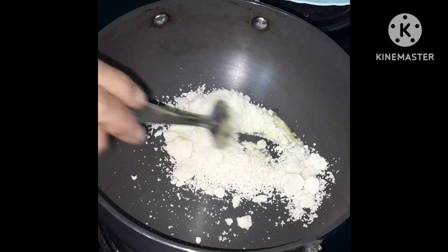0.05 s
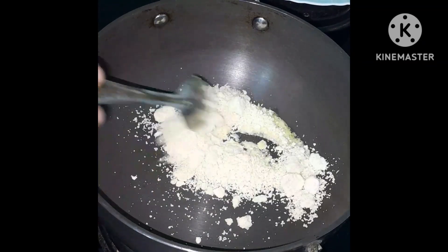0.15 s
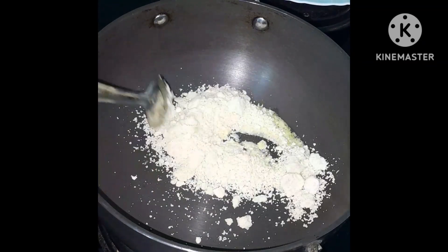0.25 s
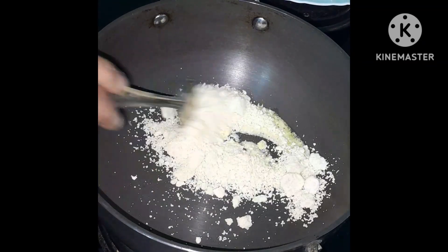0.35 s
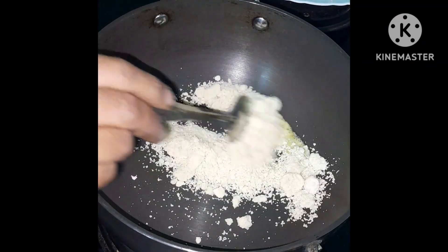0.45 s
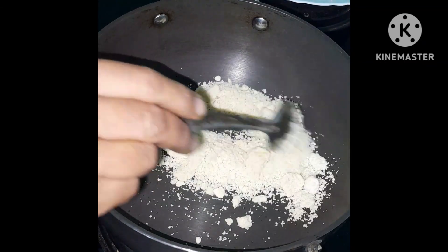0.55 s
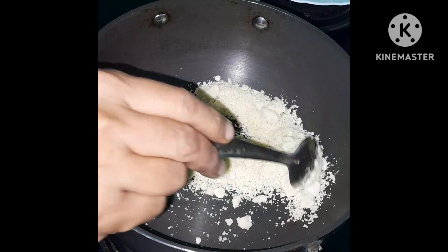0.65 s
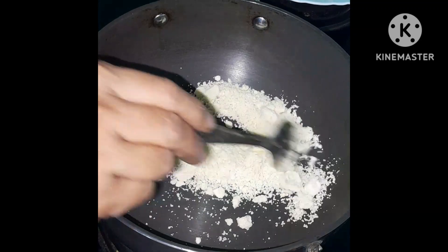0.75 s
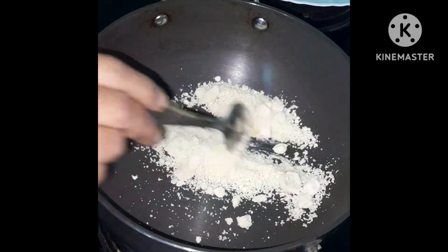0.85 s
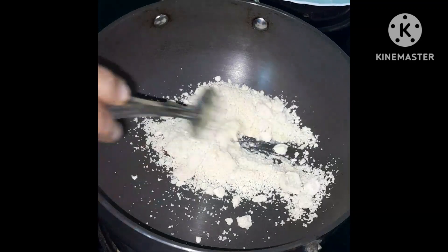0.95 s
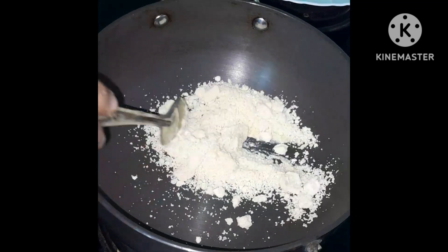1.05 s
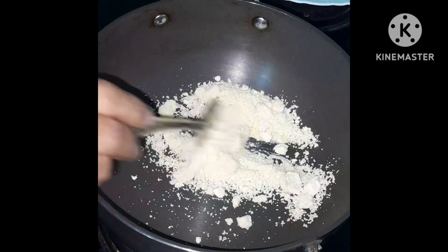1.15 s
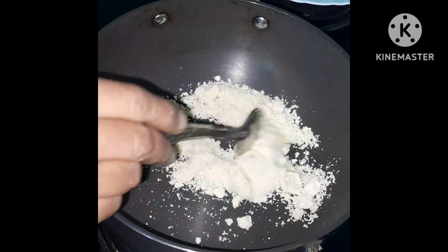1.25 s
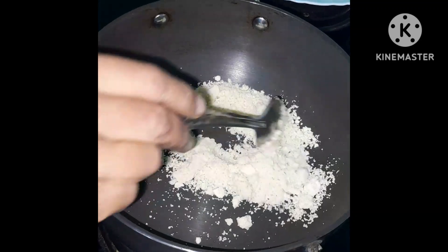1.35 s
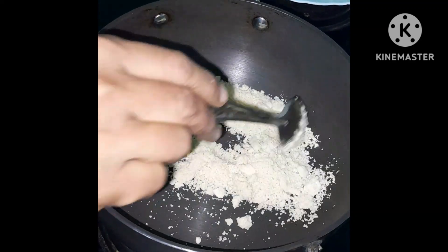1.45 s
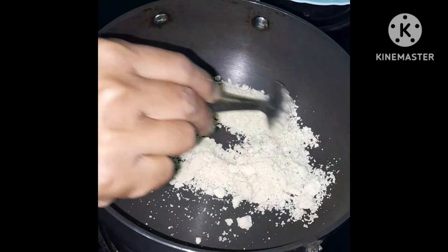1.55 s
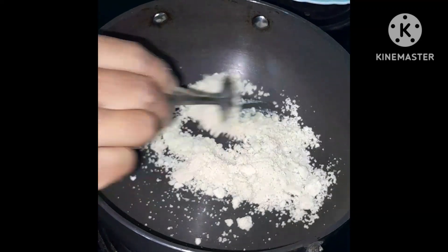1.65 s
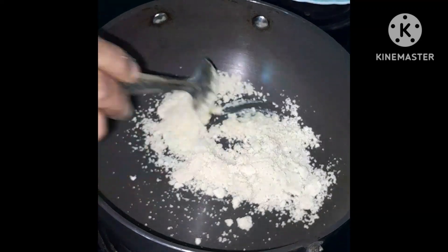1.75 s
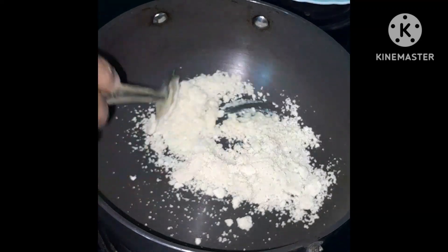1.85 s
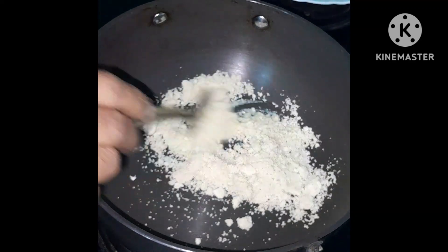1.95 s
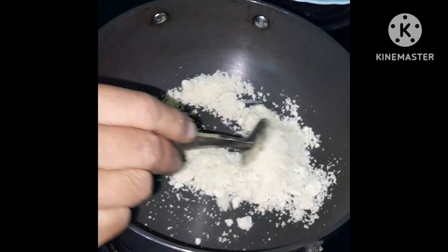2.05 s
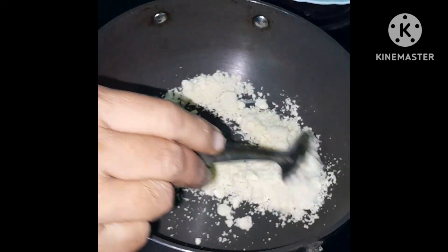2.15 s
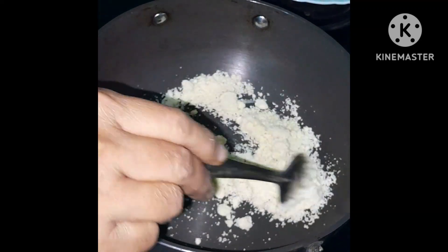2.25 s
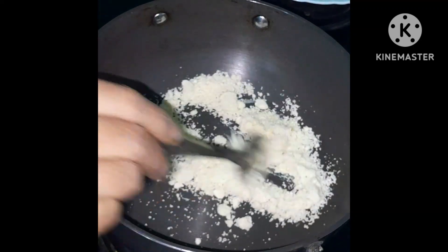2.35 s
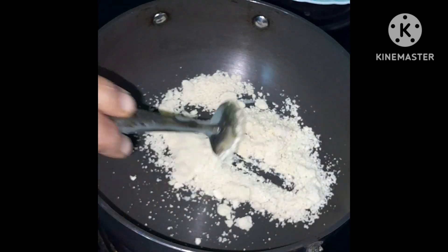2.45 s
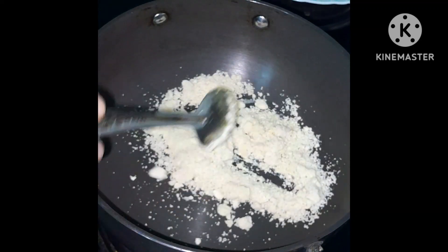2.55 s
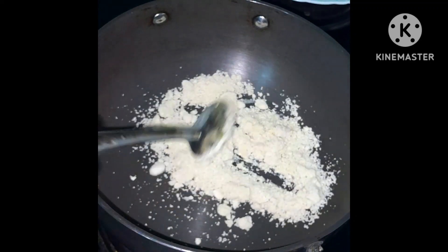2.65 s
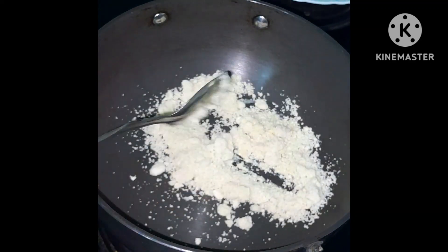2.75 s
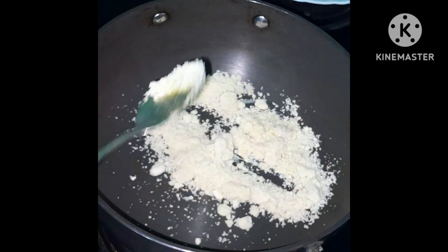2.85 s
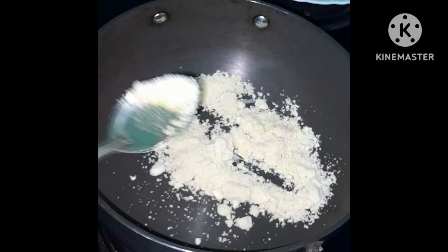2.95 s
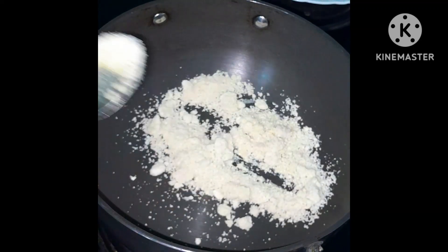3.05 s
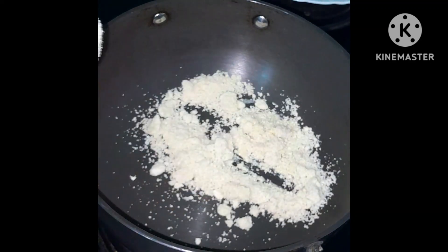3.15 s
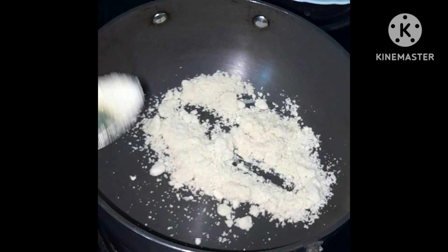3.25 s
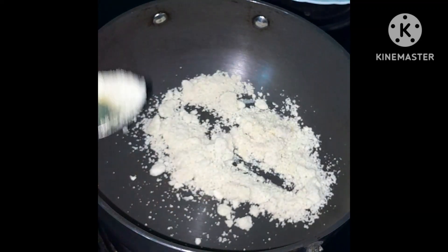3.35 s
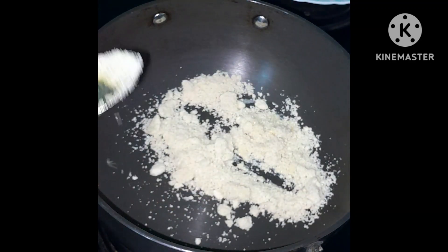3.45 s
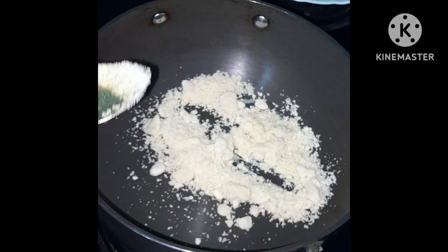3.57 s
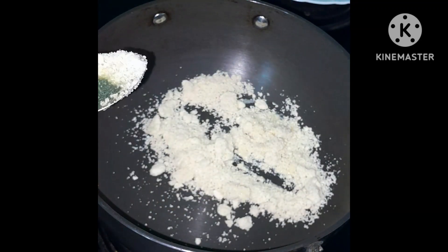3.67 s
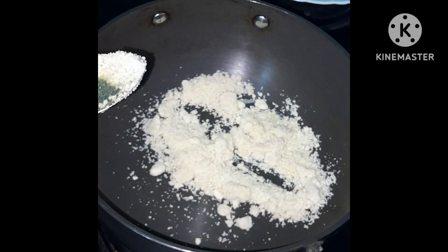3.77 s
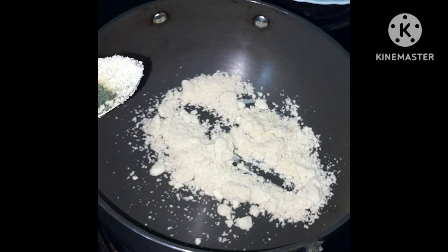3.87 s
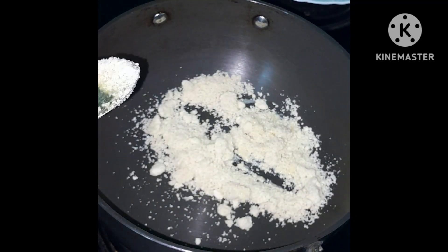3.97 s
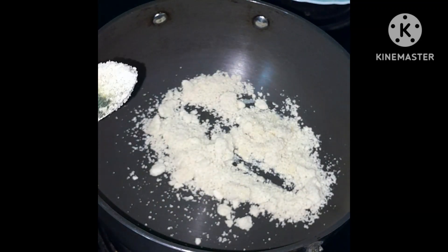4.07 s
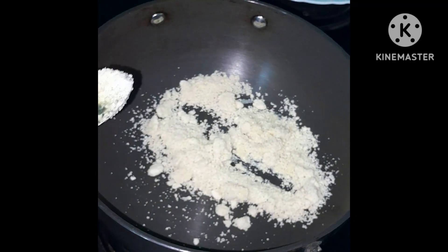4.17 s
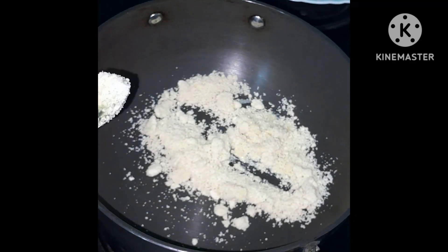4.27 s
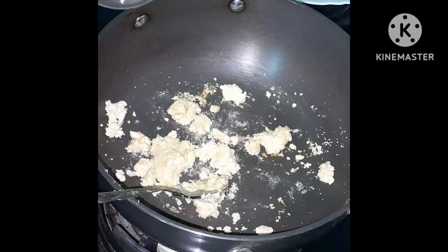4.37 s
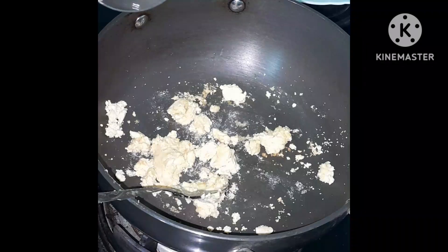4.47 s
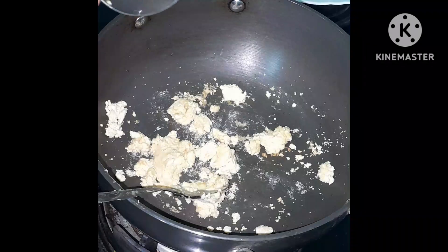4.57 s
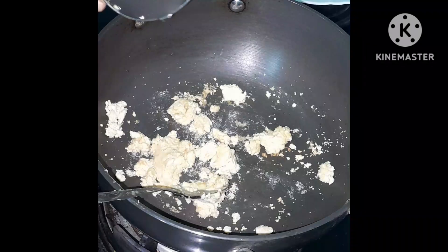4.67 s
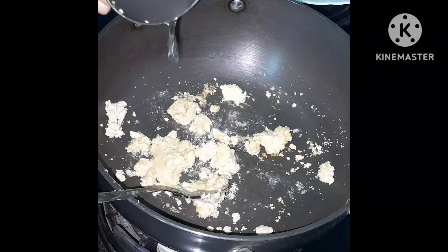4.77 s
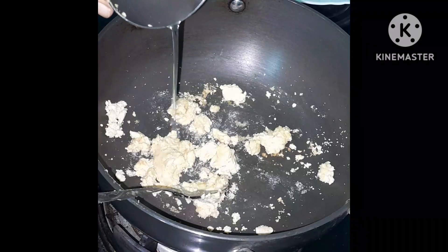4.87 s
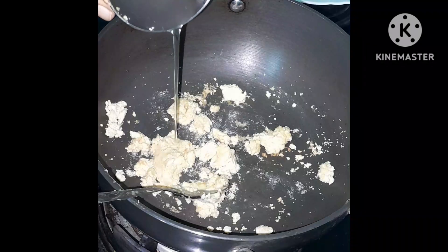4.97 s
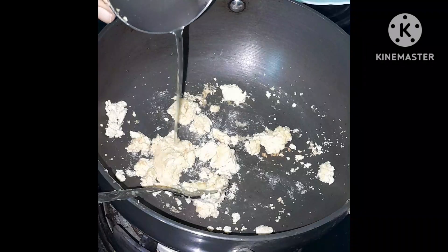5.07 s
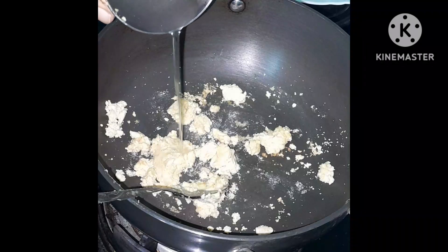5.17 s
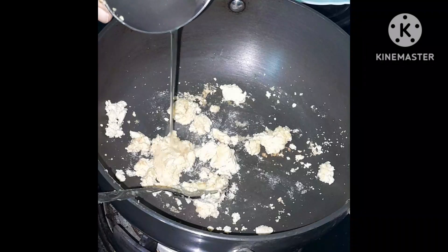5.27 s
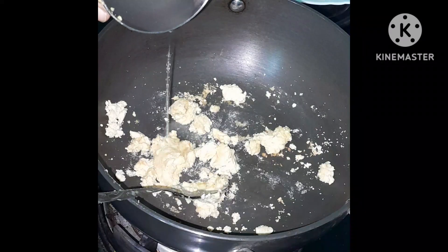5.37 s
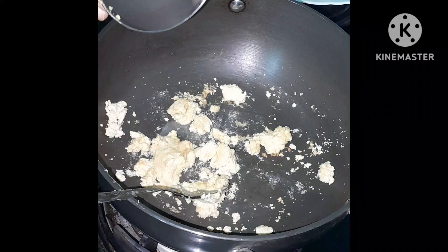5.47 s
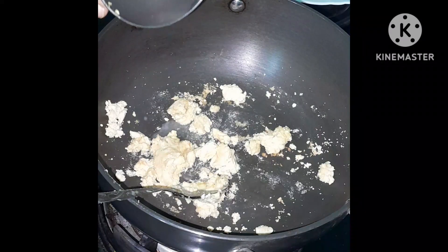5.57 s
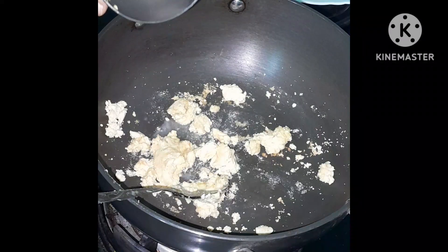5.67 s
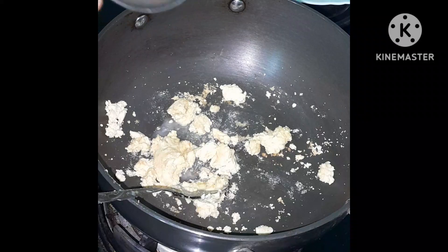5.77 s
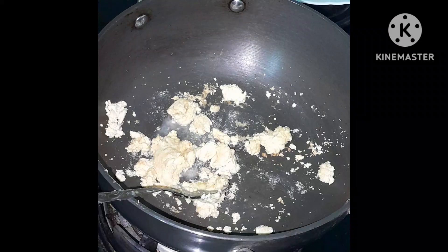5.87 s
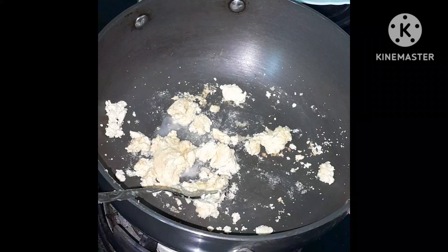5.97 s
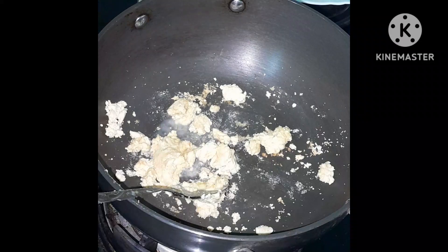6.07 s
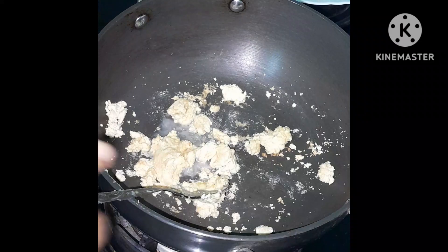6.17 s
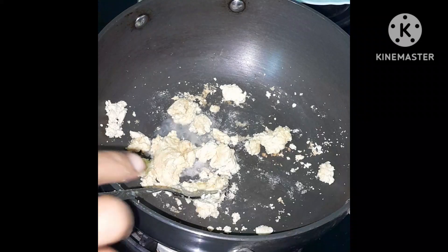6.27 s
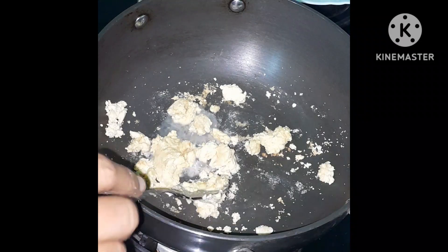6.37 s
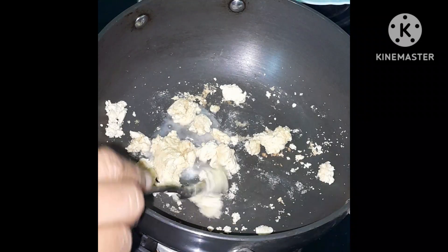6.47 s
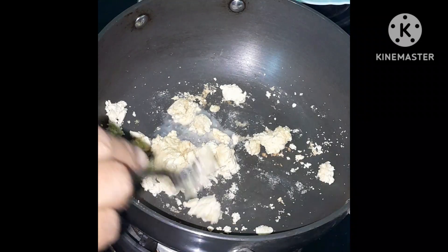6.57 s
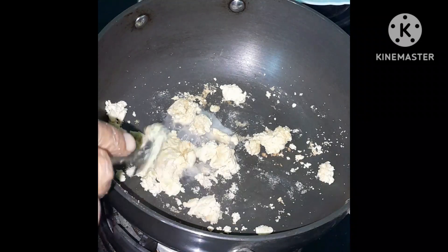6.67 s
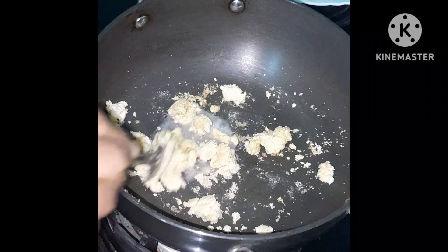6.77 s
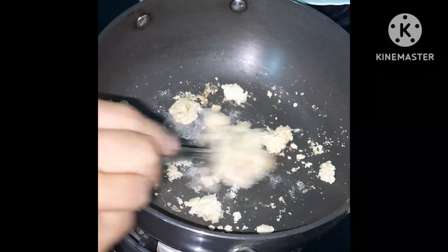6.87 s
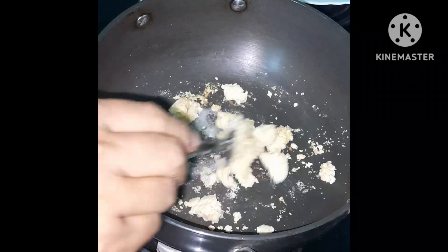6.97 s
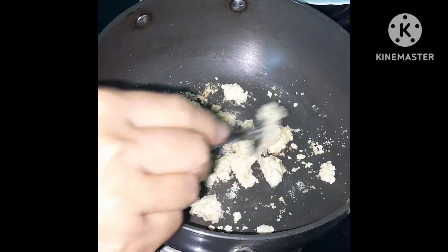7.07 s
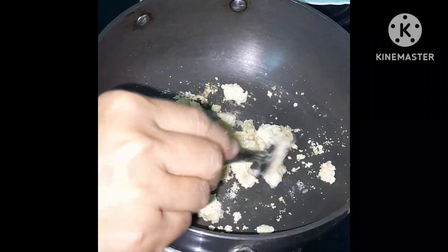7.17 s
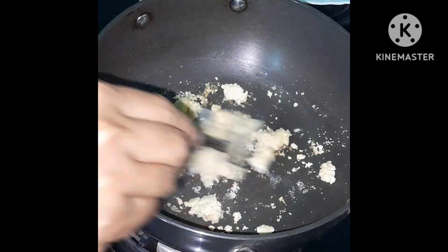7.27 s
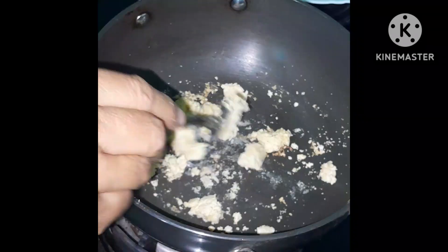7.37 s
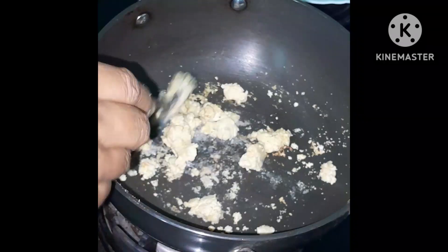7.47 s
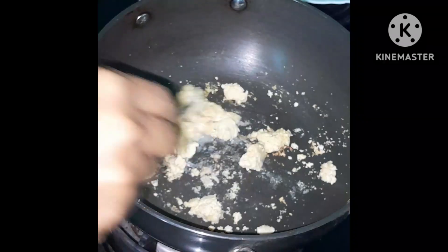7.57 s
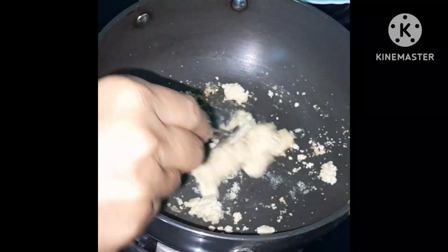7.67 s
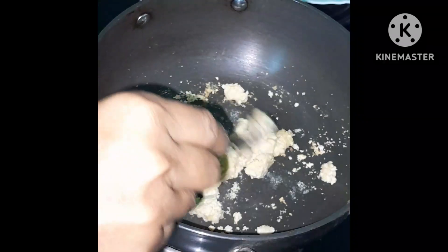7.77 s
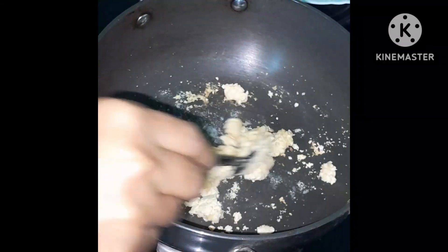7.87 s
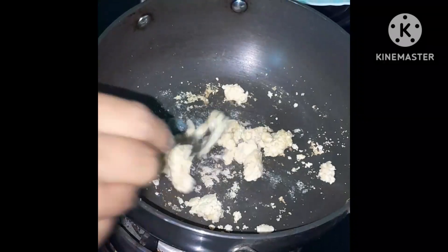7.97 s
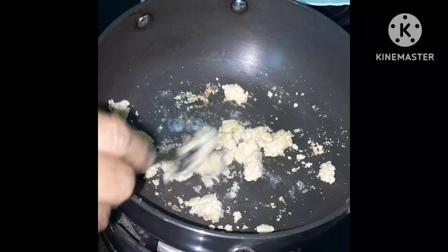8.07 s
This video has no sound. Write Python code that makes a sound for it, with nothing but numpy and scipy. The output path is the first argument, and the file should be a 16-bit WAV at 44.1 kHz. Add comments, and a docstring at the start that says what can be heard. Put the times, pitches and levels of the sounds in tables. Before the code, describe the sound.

From the start until about 2 seconds, a steel spoon taps and scrapes through dry powder in a pan, in short crunchy strokes with brief metallic rings, the sharpest at the opening and at 1.6 seconds. Lighter, bright clinks continue until about 2.9 seconds. A gas flame flutters quietly underneath throughout, with a faint hiss. A distant hoarse call comes near 1.1 seconds, and a faint bird trills and sings two falling notes from 3.5 to 4.2. The sound fades to a moment of silence around 4.4 seconds. Another far call comes near 4.9. At 5 seconds ghee starts sizzling, a grainy fizz over bubbling, growing until 7.3 and then easing. Between 6.9 and 7.8 seconds the pan knocks on its stand several times, hardest at 7.2, followed by a sharp double spoon tap. Two spaced microphones hear it in a small, hard-walled kitchen.

```python
"""A steel spoon taps and scrapes through dry powder in a pan, making the metal ring and the powder crunch.
A gas flame flutters under the pan; far off, a bird whistles and hoarse calls sound.
After a fade to silence, ghee sizzles in the hot pan as steam bubbles burst, and the stirred pan knocks
on its stand. Two spaced microphones hear it all in a small kitchen with hard walls."""
import sys
import numpy as np
from scipy import signal
from scipy.fft import rfft, irfft, next_fast_len
from scipy.io import wavfile
from scipy.ndimage import map_coordinates

SR = 44100
rng = np.random.default_rng(int(sys.argv[2]) if len(sys.argv) > 2 else 0)


def log_audio(samples):
    """Write samples as a 16-bit WAV file to the path given in sys.argv[1]."""
    # one column per channel
    frames = np.atleast_2d(samples).T
    # limit to full scale, then quantise
    limited = np.clip(frames, -1, 1)
    pcm = np.round(limited * 32767).astype(np.int16)
    wavfile.write(sys.argv[1], SR, pcm)


N = 358533
TIME = np.arange(N) / SR


def amp(db):
    """Turns decibels into a number to multiply by."""
    return 10 ** (np.asarray(db) / 20)


def along(points, hz):
    """Reads between (frequency, value) points, spaced by octaves."""
    f, v = np.transpose(points)
    return np.interp(np.log(hz + 1), np.log(f + 1), v)


def curves(rows):
    """Joins timed rows with straight lines, one curve per column after the time."""
    times, *columns = np.transpose(rows)
    return [np.interp(TIME, times, column) for column in columns]


def wobble(rate):
    """A smooth curve through `rate` random values a second."""
    return map_coordinates(rng.standard_normal(int(N * rate / SR) + 4), [TIME * rate])


def filtered(x, response):
    """Turns each frequency of x up or down as `response` says."""
    size = next_fast_len(x.shape[-1] + SR // 5)
    return irfft(rfft(x, size) * response(np.fft.rfftfreq(size, 1 / SR)), size)[..., :x.shape[-1]]


def resonances(modes):
    """A filter made of modes, the tones an object likes to ring at."""
    return lambda f: sum((-1) ** k * amp(db) * 1j * f * width / (hz * hz - f * f + 1j * f * width)
                         for k, (hz, width, db) in enumerate(modes))


def coloured(spectrum):
    """A filter that follows (frequency, level) points."""
    return lambda hz: amp(along(spectrum, hz))


def ring(modes, t, attack_s):
    """Struck tones, each of random strength, dying by 60 dB in t60 seconds."""
    chance_db = rng.standard_normal(len(modes))
    tones = sum(amp(db + extra - 60 * t / t60) * np.sin(2 * np.pi * hz * t)
                for (hz, db, t60), extra in zip(modes, chance_db))
    return (1 - np.exp(-t / attack_s)) * tones


def add(track, start, sound):
    """Mixes a sound in at `start` seconds."""
    part = track[round(start * SR):][:len(sound)]
    part += sound[:len(part)]


# How alike the two microphones sound: f/Hz, likeness (1 = the same)
LIKENESS = [(60, 0.7), (180, 0.77), (550, 0.14), (1650, -0.036), (5000, -0.068), (15000, -0.13)]
def stereo_noise(grain_db, rate):
    """Hiss that flickers at both microphones at once; only its bass is alike in both."""
    noise = rng.standard_normal((2, N)) * amp(grain_db * wobble(rate))
    angle = lambda hz: np.arccos(np.clip(along(LIKENESS, hz), -1, 1)) / 2
    mid, side = filtered(noise, lambda hz: np.array([np.cos(angle(hz)), np.sin(angle(hz))]))
    return np.array([mid + side, mid - side])


def shaped_noise(response, grain_db, rate):
    """Filtered stereo noise with an average strength (rms) of 1."""
    noise = filtered(stereo_noise(grain_db, rate), response)
    return noise / np.sqrt(np.mean(noise ** 2) + 1e-20)


# How long the kitchen echoes: f/Hz, time to die by 60 dB/s
ECHO_TIMES = [(100, 0.87), (1000, 0.32), (5000, 0.26), (14000, 0.21)]
def room(x, slower=1):
    """Each frequency echoes off the walls for its own time; the room is too small to scatter bass."""
    hz, t, noise = signal.stft(rng.standard_normal((2, SR // 2)), SR, nperseg=256)
    bass_cut = (hz ** 2 / (hz ** 2 + 450 ** 2))[:, None]
    decay = amp(-60 * t / (slower * along(ECHO_TIMES, hz)[:, None]))
    tail = signal.istft(noise * bass_cut * decay, SR, nperseg=256)[1]
    return signal.fftconvolve(np.atleast_2d(x), tail / np.linalg.norm(tail[0]), axes=1)[:, :N]


# The flame over time: t/s, roar level/dB, rumble level/dB
FLAME_LEVELS = [(0, -59, -73), (1.8, -61, -70), (3.7, -60.5, -72), (4.2, -61.5, -73), (4.6, -63, -77),
                (5.6, -61, -66.5), (7.6, -59, -65), (8.13, -59, -70)]
# Tones of the burner ring: f/Hz, width/Hz, level/dB
BURNER_MODES = [(699.4, 21.6, -7.5), (1315.7, 28.4, -5)]
# Tone colours of the flame's roar, its rumble and the gas hiss: f/Hz, level/dB
ROAR_COLOUR = [(120, -50.5), (200, -16), (637, -4), (695, -6.5), (918, -11.5), (1320, -5.5), (1550, -14.5),
               (2600, -37.5), (3380, -70.5), (5720, -120)]
RUMBLE_COLOUR = [(15, -59), (30, -24), (48, -9.5), (62, 5.5), (80, -9.5), (110, 0.5), (150, -5.5),
                 (260, -17.5), (400, -53)]
HISS_COLOUR = [(1200, -42.5), (2000, -9), (3000, -6.5), (5000, -16), (8500, -6.5), (12000, -2),
               (14800, -5.5), (15700, -13)]
def burner():
    """The flame flutters in the burner's own tones, over rumble and gas hiss."""
    roar_db, rumble_db = curves(FLAME_LEVELS)
    flutter = shaped_noise(resonances(BURNER_MODES), grain_db=1.5, rate=30)
    roar = amp(-1) * shaped_noise(coloured(ROAR_COLOUR), grain_db=1.5, rate=16)
    rumble = shaped_noise(coloured(RUMBLE_COLOUR), grain_db=1, rate=5.8)
    hiss = shaped_noise(coloured(HISS_COLOUR), grain_db=0.3, rate=8)
    return amp(roar_db - 0.5) * (flutter + roar) + amp(rumble_db) * rumble + amp(-75) * hiss


# The hot pan's seething over time: t/s, level/dB
SEETHE_LEVELS = [(0, -70.5), (1.4, -74.5), (2.4, -71.5), (2.75, -67), (3.15, -73), (3.3, -69.5),
                 (3.75, -67.5), (4.2, -70.5), (4.6, -75)]
# Its tone colour: f/Hz, level/dB
SEETHE_COLOUR = [(1500, -31), (2500, -8), (4000, -2.5), (6000, 0.5), (8300, -4), (9200, -15),
                 (15700, -26.5)]
def seethe():
    """The hot pan seethes with a faint, high hiss."""
    return amp(curves(SEETHE_LEVELS)[0]) * shaped_noise(coloured(SEETHE_COLOUR), grain_db=0, rate=200)


def note(path, rough, harmonics_db=(0,)):
    """A tone gliding through (time, pitch, level) points; `rough` makes the pitch shake."""
    hz, db = curves(path)
    gate = np.clip(np.minimum(TIME - path[0][0], path[-1][0] - TIME) / 0.003, 0, 1)
    phase = 2 * np.pi * np.cumsum(hz * (1 + rough * wobble(140))) / SR
    return gate * amp(db) * sum(amp(level) * np.sin(k * phase) for k, level in enumerate(harmonics_db, 1))


# The bird's trilled note: t/s, f/Hz, level/dB
WHISTLE_PATH = [(3.51, 7300, -74), (3.574, 6694, -58), (3.62, 6670, -57), (3.68, 6450, -55),
                (3.76, 6440, -77)]
# Its falling notes: t/s, length/s, level/dB
FALLING_NOTES = [(3.77, .065, -59), (4.0, .16, -56.5)]
def bird():
    """A far bird trills, then sings two falling notes heard only as echo."""
    trill = 1 + 0.68 * np.sin(2 * np.pi * 75 * TIME + wobble(9.2))
    whistle = trill * note(WHISTLE_PATH, rough=0.008)
    sweeps = np.zeros(N)
    for start, length, db in FALLING_NOTES:
        path = [(start, 7500, db - 9), (start + length / 2, 5400, db), (start + length, 2650, db - 12)]
        sweeps += note(path, rough=0.012)
    return amp(-2) * whistle + room(amp(1) * whistle + amp(6.5) * sweeps, slower=1.74)


# Far calls: t/s, length/s, f/Hz, level/dB, list of each harmonic's level/dB
CALLS = [(4.89, 0.367, 650, -57.5, [-20, 5.5, 0.5, -22, -24, -16, -18]), (1.086, .3, 582, -51, [0, -21.5])]
def hoarse_calls():
    """Far calls, mostly echo, swell and fade; a shaky pitch makes them hoarse."""
    calls = np.zeros(N)
    for start, length, hz, db, harmonics_db in CALLS:
        path = [(start, 0.99 * hz, db - 9.5),
                (start + 0.34 * length, hz, db),
                (start + length, 0.99 * hz, db - 9)]
        calls += note(path, rough=0.017, harmonics_db=harmonics_db)
    return amp(-3.5) * calls + amp(1.5) * room(calls, slower=1.1)


# The sizzle over time: t/s, level/dB
SIZZLE_LEVELS = [(5.07, -50.5), (5.22, -44.5), (5.3, -44), (5.61, -45), (5.7, -39), (5.95, -37.5),
                 (6.98, -38), (7.24, -35), (7.34, -37), (7.46, -42), (7.67, -46), (7.9, -45), (8.0, -41.5),
                 (8.13, -46.5)]
# Tone colours of the high fizz and the low bubbling: f/Hz, level/dB
FIZZ_COLOUR = [(1060, -40), (1800, -13), (2680, -1.5), (3160, -4), (3490, -2), (6520, 0), (7740, 1.5),
               (9280, -4.5), (12000, -3.5), (14500, -5.5), (15700, -10)]
BUBBLE_COLOUR = [(150, -49), (250, -20.5), (356, -11.5), (396, -7), (749, 0), (1190, -5), (1470, 2.5),
                 (2000, -9.5), (2600, -7.5), (3380, -87), (5720, -120)]
def sizzle():
    """Countless steam bubbles burst in the fat: a grainy fizz over lower bubbling."""
    lands_s, swell_db_per_s = 5.045, 300  # the sound swells until the fat reaches the hot metal
    surge = wobble(7)
    fizz = amp(0.88 * surge) * shaped_noise(coloured(FIZZ_COLOUR), grain_db=1, rate=900)
    bubbling = amp(-10.5 + 0.5 * surge) * shaped_noise(coloured(BUBBLE_COLOUR), grain_db=0, rate=120)
    swell_db = swell_db_per_s * np.minimum(TIME - lands_s, 0)
    return amp(curves(SIZZLE_LEVELS)[0] + swell_db) * (fizz + bubbling)


# Tones of the stove top and of the pan's rim: f/Hz, level/dB, time to die by 60 dB/s
STOVE_MODES = [(109.8, 5.5, 0.39), (138, -6, 0.66), (195.2, 2, 0.64), (219, 6, 0.26)]
RIM_MODES = [(965, -5, .35), (2697, 7, 0.16), (5062, -5, 0.47)]
# Tones of the pan's belly: f/Hz, width/Hz, level/dB
BELLY_MODES = [(385, 148, -4.5), (558, 57, -3.5), (673, 120, -11), (954, 33, -1), (1026, 66, -3.5),
               (1166, 48, -5.5), (1510, 360, -14)]
# The pan hitting its stand: t/s, stove level/dB, belly level/dB, hum f/Hz, hum level/dB
PAN_KNOCKS = [(6.877, -46.5, -41.5, 406, -51), (6.957, -45.5, -41.5, 331, -40),
              (7.1725, -21.5, -20, 400, -40), (7.412, -34.5, -32.5, 478, -46),
              (7.662, -44.5, -41.5, 443, -42.5), (7.755, -60, -46.5, 324.5, -43.5)]
def knocks():
    """The pan drops on its stand: stove top and rim ring, the belly rattles, the rocking foot hums."""
    out, t = np.zeros(N), np.arange(SR * 3 // 4) / SR
    hardest_db = max(row[2] for row in PAN_KNOCKS)
    for start, stove_db, belly_db, hum_hz, hum_db in PAN_KNOCKS:
        rim_db = -22 + 1.84 * (belly_db - hardest_db)  # soft knocks barely ring the rim
        # The rim chatters, then the pan settles and quiets it.
        rocking_db = 1.5 * wobble(50)[:len(t)] - 9 * np.clip((t - 0.05) / 0.025, 0, 1)
        add(out, start, amp(stove_db - 12) * ring(STOVE_MODES, t, attack_s=0.011))
        rattle = rng.standard_normal(len(t)) * (amp(-60 * t / 0.25) + 3.5 * amp(-60 * t / 0.01))
        add(out, start, amp(belly_db + 14.5) * filtered(rattle, resonances(BELLY_MODES)))
        add(out, start, amp(rim_db + rocking_db) * ring(RIM_MODES, t, attack_s=0.003))
        add(out, start, amp(hum_db) * ring([(hum_hz, 0, 0.2)], t, attack_s=0.0085))
    return out


# Tones of the small clinking metal: f/Hz, level/dB
CLINK_MODES = [(5800, 3), (6300, -6), (9000, -7), (9600, -8), (10500, 0), (11100, 1.5), (11800, -5.5),
               (14500, 6)]
# Bright clinks: t/s, level/dB, main f/Hz, extra chatter level/dB, time to die by 60 dB/s
CLINK_HITS = [(0.2955, -44.5, 5930, -11, 0.058), (0.975, -38.5, 11000, -4.5, 0.17),
              (1.0575, -44, 9800, -7, 0.22), (1.8437, -53, 7400, -12, 0.07), (1.915, -55, 11200, -6, 0.08),
              (1.932, -44, 7950, -10, 0.08), (1.9864, -47, 6800, -8, 0.07), (2.12, -40, 6680, -14, 0.065),
              (2.3915, -55, 10800, -5, 0.08), (2.43, -42, 5900, -2, 0.21), (2.5471, -57, 11000, 0, 0.14),
              (2.583, -50.5, 6200, -1.5, 0.14), (2.6943, -40.5, 10400, -8.5, 0.14),
              (2.7344, -50, 11100, -9, 0.08), (2.804, -54, 9100, -6, 0.08), (2.8594, -57, 6440, -1, 0.08)]
def clinks():
    """Small metal ticks, then chatters in the high tones nearest the one struck."""
    out, t = np.zeros(N), np.arange(SR // 4) / SR
    for start, db, main_hz, chatter_db, t60 in CLINK_HITS:
        tick = np.diff(rng.standard_normal(len(t) + 1)) * amp(1 - 60 * t / 0.004)
        metal = resonances([(hz, 90, level - 18 * abs(np.log2(hz / main_hz))) for hz, level in CLINK_MODES])
        burst = rng.standard_normal(len(t)) * amp(-60 * t / t60)
        chatter = filtered(burst, lambda f: metal(f) + 0.058 * (f > 4500))
        add(out, start, amp(db) * (tick + amp(chatter_db + 11) * chatter))
    return out


def favour(modes, centre_hz, boost_db, tilt_db=0):
    """The spot touched boosts the tones near centre_hz; tilt_db per octave brightens or dulls them."""
    nearness = lambda hz: np.exp(-np.log2(hz / centre_hz) ** 2 / 0.072)
    return [(hz, width, db + tilt_db * np.log2(hz / 4500) + boost_db * nearness(hz))
            for hz, width, db in modes]


# Tones of the steel (spoon and pan wall) and of the pan floor: f/Hz, width/Hz, level/dB
STEEL_MODES = [(2520, 130, -11.5), (2990, 65, -5.5), (4150, 65, -4.5), (4383, 63, -2), (5046, 164, -9),
               (5910, 150, -12.5), (6477, 63, -1.5), (6516, 60, -10.5), (7100, 87, -9), (8150, 100, -11.5),
               (8800, 75, -14), (9750, 100, -21), (10510, 120, -17), (11280, 190, -18), (12700, 90, -19)]
FLOOR_MODES = [(324, 46, -8.5), (435, 77, -7.5), (551, 75, -3.5), (703, 102, 0), (840, 60, -1.5),
               (974, 55, -2.5), (1243, 55, -6.5), (1458, 71, 0), (1698, 140, -13.5)]
# The spoon tip landing: t/s, level/dB, thud level/dB, ring f/Hz, favoured floor f/Hz
SPOON_TAPS = [(.0064, -19.5, -25.5, 4370, 1480), (.3566, -24, -24.5, 4060, 1580),
              (.414, -24, -29.5, 3015, 747), (.768, -48, -35, 1400, 764), (1.1712, -45, -48, 1475, 1480),
              (1.6017, -18, -18.5, 1430, 1420), (2.002, -45, -52, 3000, 1480),
              (7.338, -19.5, -40.5, 1400, 1450), (7.357, -16.5, -37, 1528, 1500)]
def taps():
    """The spoon lands with a crack of steel, a thud of the pan floor and one short ring."""
    out, t = np.zeros(N), np.arange(SR // 5) / SR
    # The resting spoon muffles the steel: wider modes die sooner.
    steel = resonances([(hz, 1.8 * width, db) for hz, width, db in STEEL_MODES])
    for start, db, thud_db, ring_hz, floor_hz in SPOON_TAPS:
        crack = amp(db + 8 - 60 * t / 0.018) * rng.standard_normal(len(t))
        thud = amp(thud_db + 8 - 60 * t / 0.015) * rng.standard_normal(len(t))
        add(out, start, filtered(crack, steel))
        add(out, start, filtered(thud, resonances(favour(FLOOR_MODES, floor_hz, boost_db=6))))
        add(out, start, amp(db - 8) * ring([(ring_hz, 0, 0.06)], t, attack_s=0.00026))
    return out


def pressure(t, rise_s, hold_s, climb_db, fall_speed=1):
    """One stroke's push: it climbs, holds, drops as the spoon lifts, then the edge trails lightly."""
    after = np.maximum(t - rise_s - hold_s, 0) * fall_speed
    lift, trail = amp(-300.5 * after), amp(-25 - 109.5 * after)
    return amp(-climb_db * np.clip(1 - t / rise_s, 0, 1)) * (lift + trail)


# Tone colour of crushed powder: f/Hz, level/dB
POWDER_COLOUR = [(1060, -60), (1800, -21), (2990, -4.5), (4450, -20), (5490, -18), (6580, -11),
                 (9540, -22.5), (14300, -20.5), (15700, -36.5)]
# Spoon strokes: t/s, rise/s, hold/s, climb/dB, bright level/dB, dull level/dB,
# favoured steel f/Hz, boost/dB, tilt/(dB per octave), favoured floor f/Hz
SPOON_STROKES = [(0.015, 0.045, 0.0043, 5, -28.5, -42.5, 2980, -1.5, -3, 1320),
                 (0.367, .003, .002, 2, -49.5, -47.5, 4200, 2, -6, 1480),
                 (0.415, 0.011, 0.023, 2.5, -35.5, -46, 3500, -1, -1, 670),
                 (0.769, 0.081, 0.0032, 28, -30, -41, 6200, 4, 1.5, 890),
                 (1.171, 0.035, 0.029, 13, -39, -44.5, 2740, 9, -.5, 1440),
                 (1.607, 0.0031, 0.097, 1.5, -42.5, -39.5, 6000, 3.5, 3.5, 910),
                 (1.97, 0.074, 0.0023, 36, -35.5, -47.5, 6740, 2, 1.5, 1310),
                 (7.334, 0.0092, 0.011, 8, -28, -41, 5100, 1.3, 0.2, 1640)]
def scrape():
    """Tiny slips of the spoon's edge shake the steel, pan floor and stove top, while powder crunches."""
    slips = stereo_noise(grain_db=3, rate=250)
    crunch = stereo_noise(grain_db=3.5, rate=500)
    stove = resonances([(hz, 18, db) for hz, db, _ in STOVE_MODES])
    out, t = np.zeros((2, N)), np.arange(SR * 2 // 5) / SR
    for (start, rise_s, hold_s, climb_db, bright_db, dull_db,
         steel_hz, boost_db, tilt_db, floor_hz) in SPOON_STROKES:
        span = slice(round(start * SR), round(start * SR) + len(t))
        bright = amp(bright_db) * pressure(t, rise_s, hold_s, climb_db)
        # The dull floor sound peaks sooner and dies more slowly.
        dull = amp(dull_db) * pressure(t, 0.65 * rise_s, 0.65 * hold_s, 0.51 * climb_db, fall_speed=0.65)
        steel = resonances(favour(STEEL_MODES, steel_hz, boost_db, tilt_db))
        floor = resonances(favour(FLOOR_MODES, floor_hz, boost_db=6))
        powder = lambda f: amp(along(POWDER_COLOUR, f) + tilt_db * np.log2((f + 1) / 4500))
        out[:, span] += amp(15) * filtered(bright * slips[:, span], steel)  # filtered last, so it rings on
        out[:, span] += amp(9.5) * bright * filtered(crunch[:, span], powder)
        out[:, span] += filtered(dull * slips[:, span], lambda f: amp(14) * floor(f) + amp(-0.5) * stove(f))
    return out


def scene():
    """Mixes every source; the hits and scrapes echo in the kitchen."""
    hits = taps() + clinks() + knocks()
    near = np.array([hits, np.roll(hits, 5)]) + scrape()  # hits reach the right microphone a little late
    echo = amp(-2.5) * room(hits) + amp(-7.5) * room(near)
    return near + echo + sizzle() + burner() + seethe() + bird() + hoarse_calls()


# How much louder the left microphone is than the right: f/Hz, level/dB
LEFT_LEAD = [(60, 0), (180, 1), (550, 3), (1650, 3.5), (5000, 2), (15000, 3.5)]
def record(dry):
    """Two unequal microphones; the sound fades out and back in, and the highest treble is cut."""
    silent_from_s, silent_to_s, fade_out_s, fade_in_s = 4.368, 4.488, 0.1, 0.06
    top_hz = 15820
    ramps = np.maximum((silent_from_s - TIME) / fade_out_s, (TIME - silent_to_s) / fade_in_s)
    fade = np.clip(ramps, 0, 1) ** 1.34
    balance = lambda hz: amp(np.outer([0.5, -0.5], along(LEFT_LEAD, hz)))
    treble_cut = lambda hz: np.clip((top_hz - hz) / 150, 0, 1) ** 2
    return filtered(amp(1.5) * dry * fade, lambda hz: balance(hz) * treble_cut(hz))


dry = scene()
out = record(dry)
log_audio(out)
```